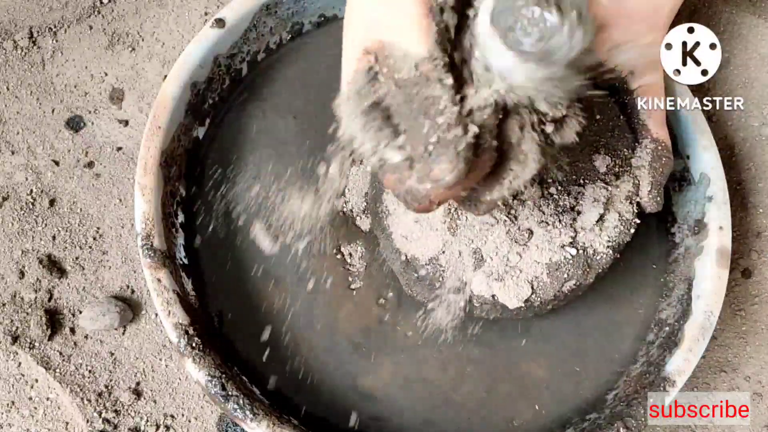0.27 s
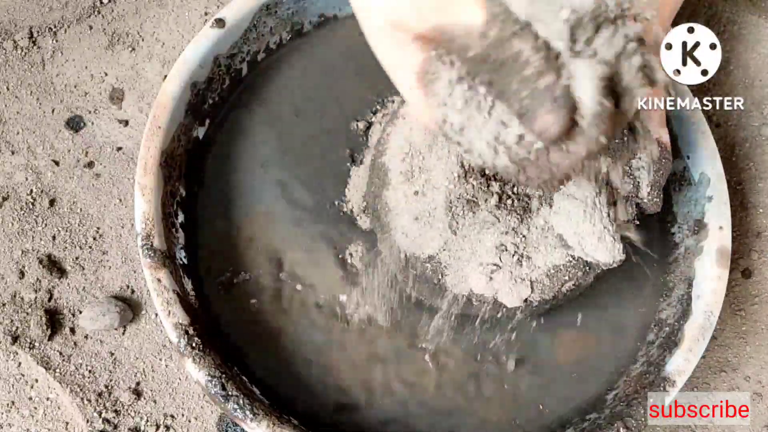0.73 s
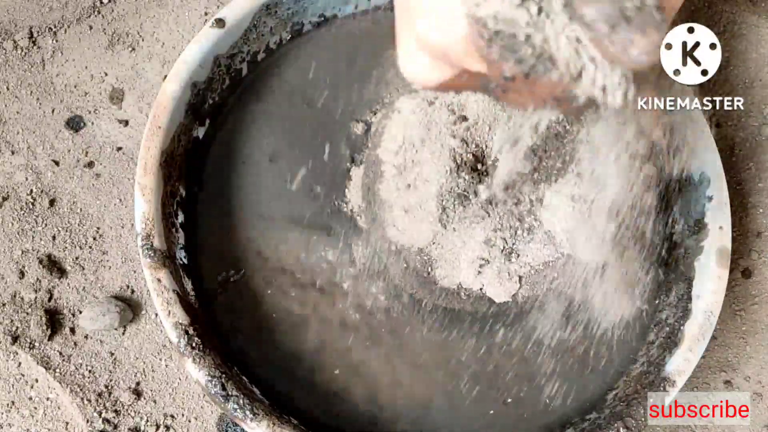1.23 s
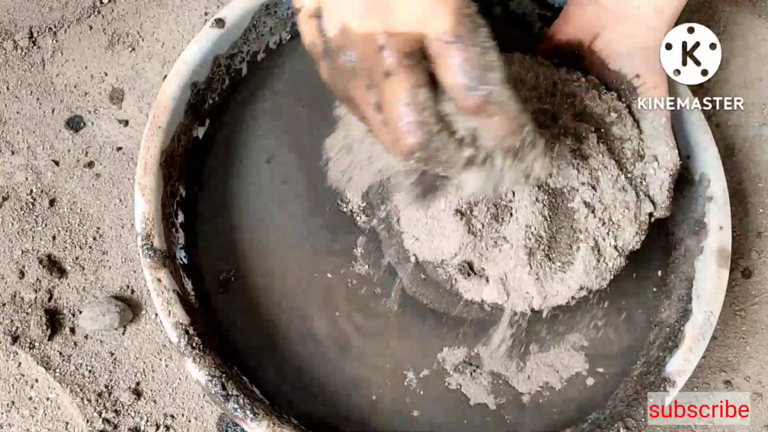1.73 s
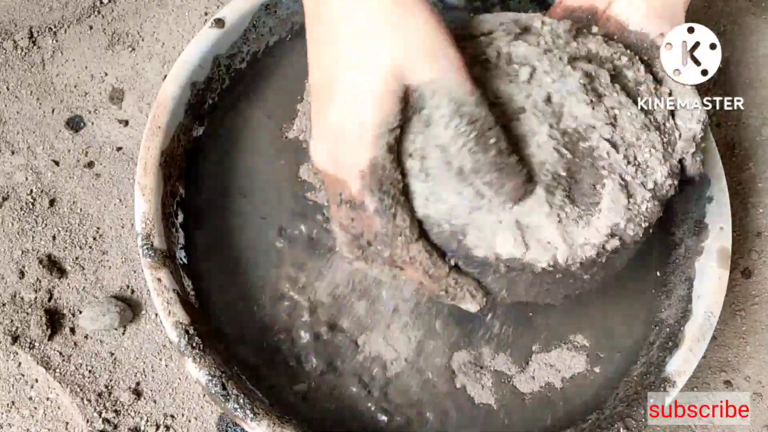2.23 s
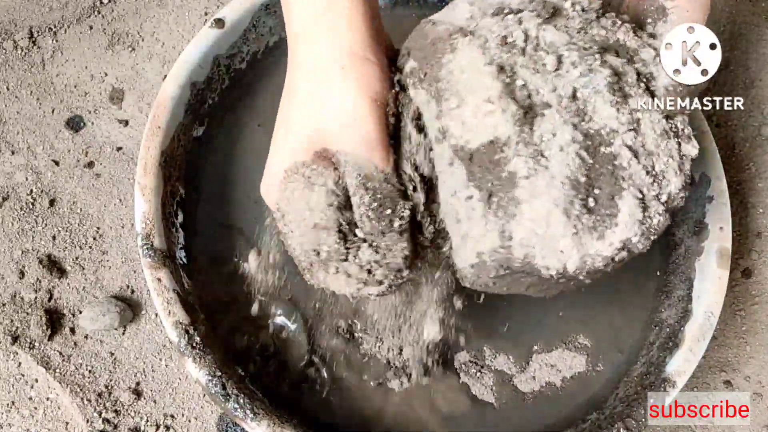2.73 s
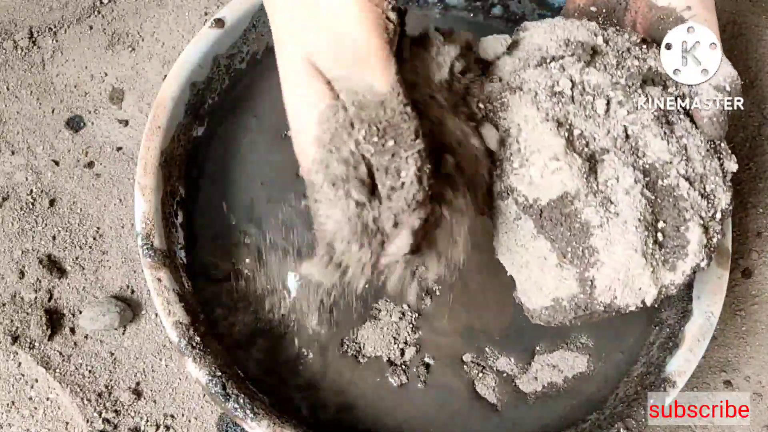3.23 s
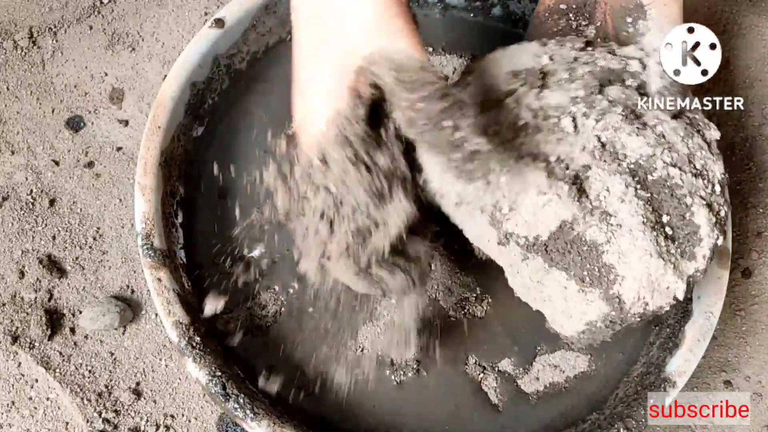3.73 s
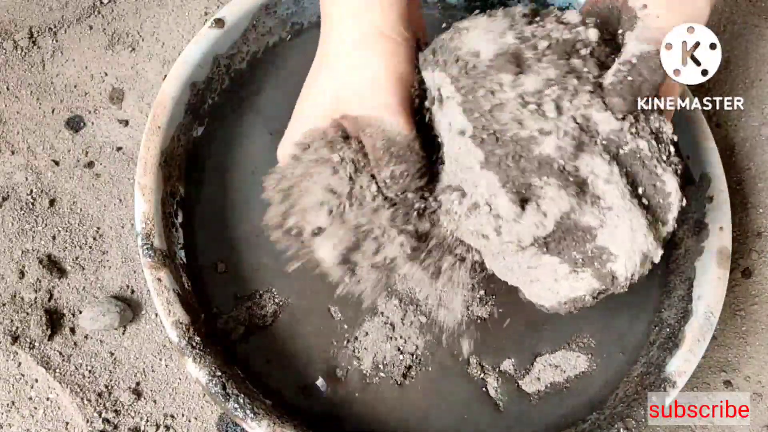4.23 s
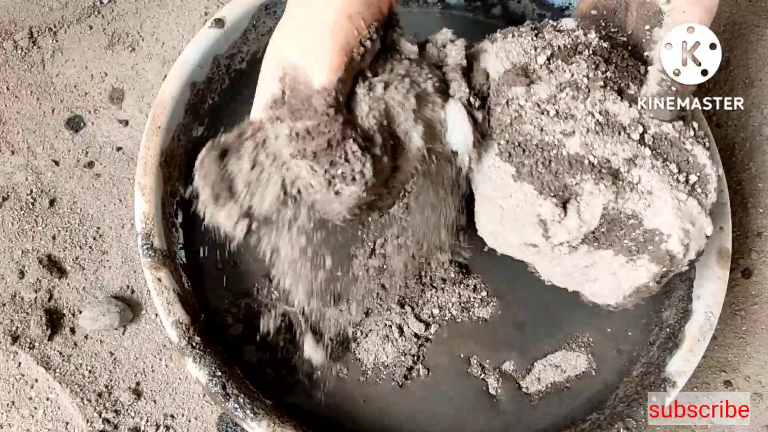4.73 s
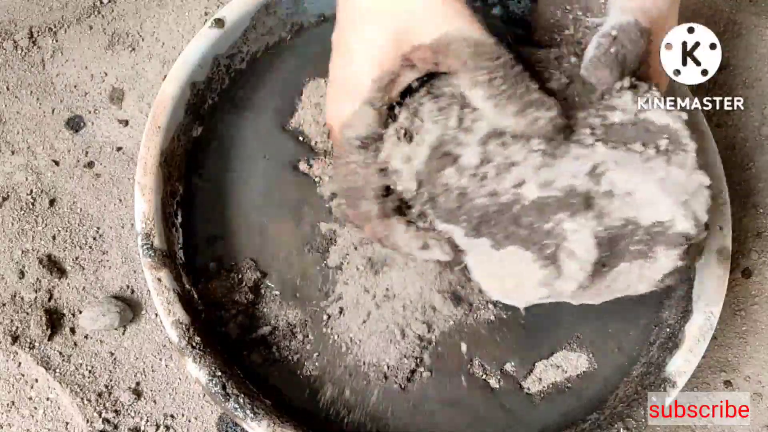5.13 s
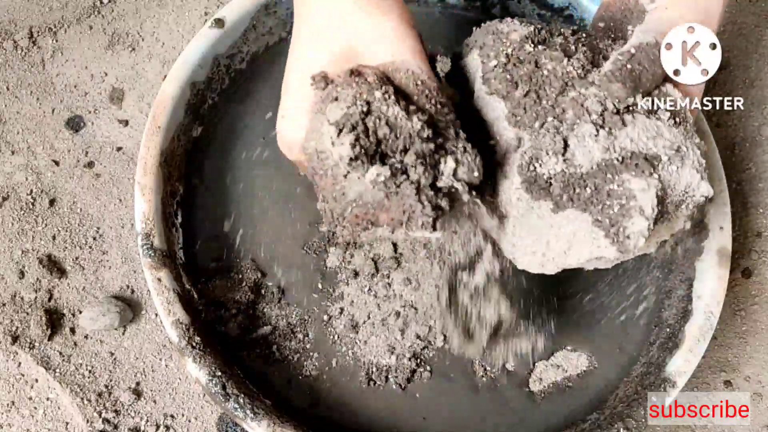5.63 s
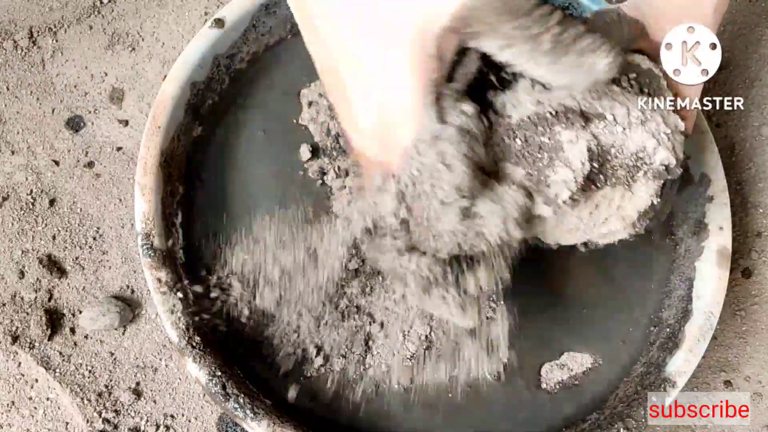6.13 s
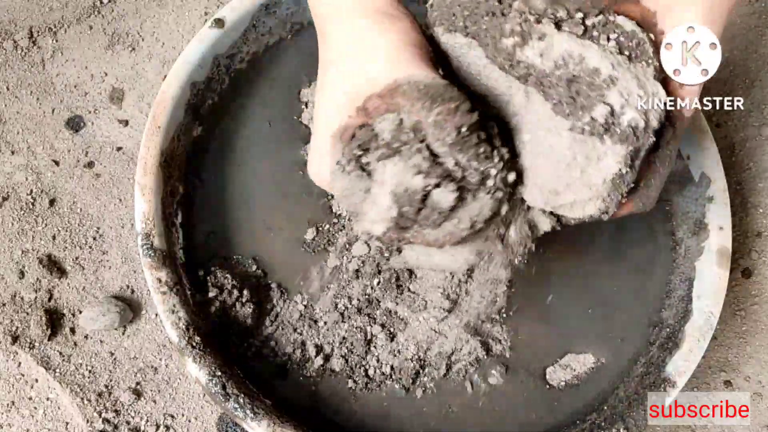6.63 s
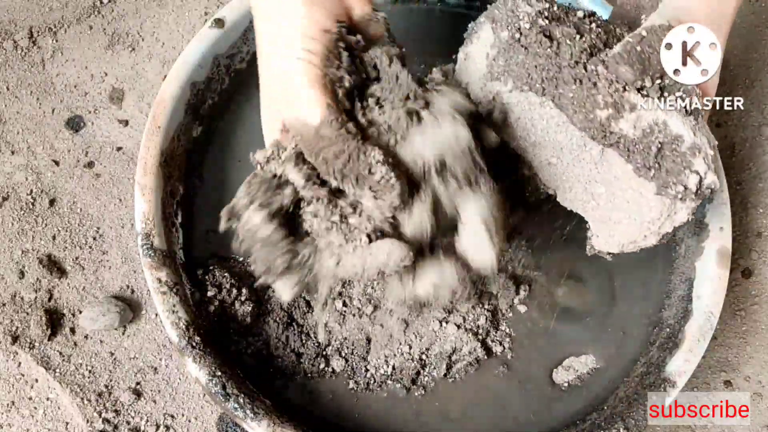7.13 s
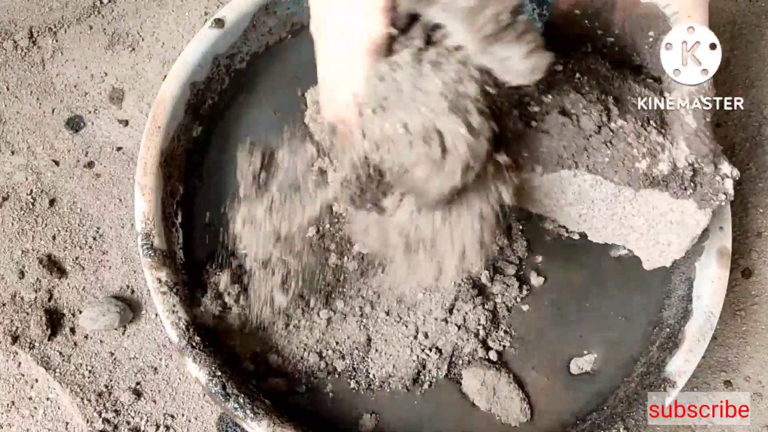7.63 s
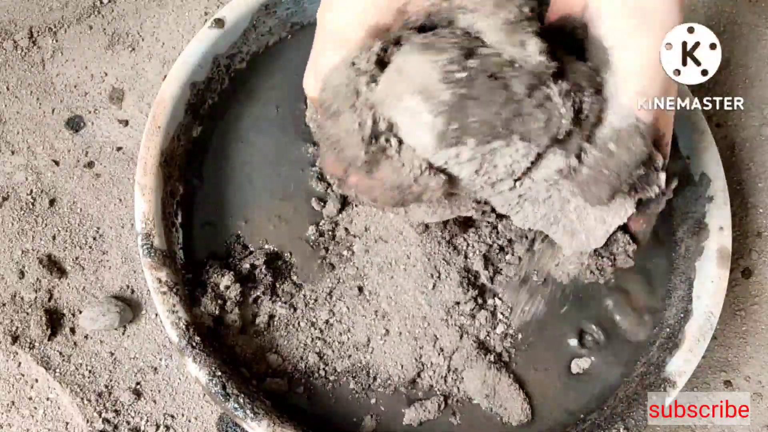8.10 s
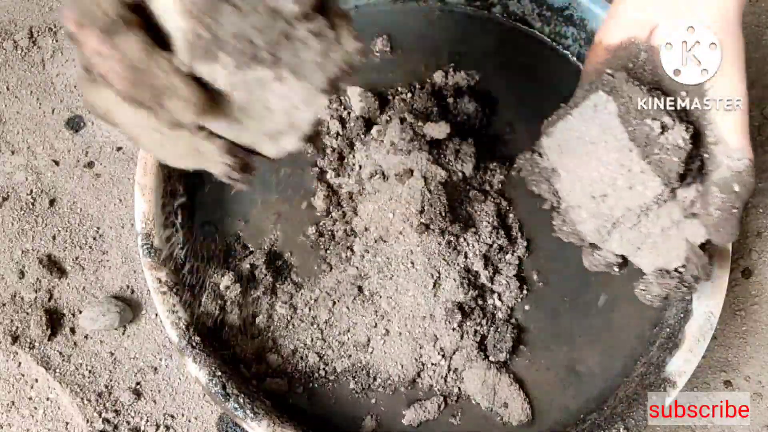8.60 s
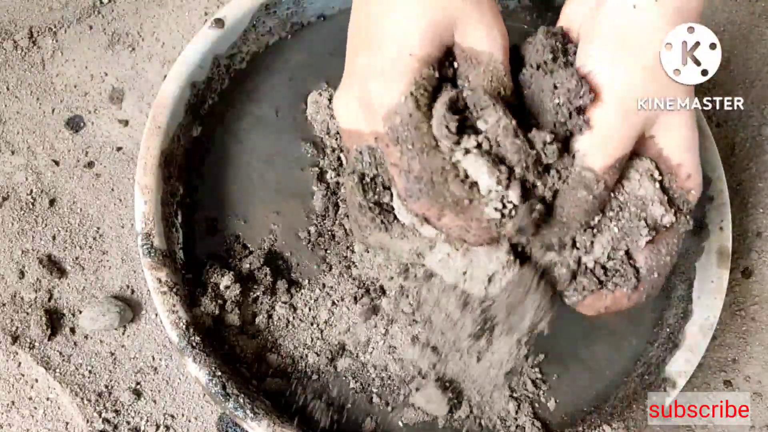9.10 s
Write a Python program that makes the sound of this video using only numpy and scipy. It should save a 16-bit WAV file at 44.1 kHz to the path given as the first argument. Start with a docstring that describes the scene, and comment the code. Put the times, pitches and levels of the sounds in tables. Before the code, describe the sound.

Very close, bright stereo sound of hands crumbling a sandy cement block over a metal basin of water outdoors. Gritty rubs come in short squeezes, each followed by a pattering shower on the water, with grain snaps and tiny plops. Light basin knocks appear from the middle; near nine seconds a big lump thumps hard with splashy plops. A low wavering hum and steady hiss lie underneath.

```python
"""Crumbling a sandy block over a basin of water

Two hands crumble sand and cement close to a hissy two-port microphone: clumped random grains make the rub
and shower, decaying sines the chips, bubbles and basin, noise bursts the snaps and splutter.
Handfuls gush, crumbs plop; near the end a big lump thumps the basin. Narrow noise bands make a wavering low
hum, and gliding tones a faint thin hiss that twice climbs in steps.
"""
import sys
import numpy as np
from scipy import signal
from scipy.fft import rfft, irfft, next_fast_len
from scipy.io import wavfile
from scipy.ndimage import uniform_filter1d

SR = 44100
rng = np.random.default_rng(int(sys.argv[2]) if len(sys.argv) > 2 else 0)


def file_out(sig):
    """Save sig as 16-bit WAV at sys.argv[1]."""
    # one column per channel
    cols = np.atleast_2d(sig).T
    # limit, then scale
    lim = np.clip(cols, -1, 1)
    pcm = np.round(lim * 32767).astype(np.int16)
    wavfile.write(sys.argv[1], SR, pcm)


N = 412776
TIME_S = np.arange(N) / SR

# Background before the ports. Each row: frequency in Hz, level in dB.
AIR_SPECTRUM = [(8, -4.5), (40, -17), (110, -28), (250, -24), (450, -27.5), (800, -39.5), (1500, -45.5),
                (3500, -41), (6500, -43.5), (8000, -33), (8900, -25.5), (10000, -22.5), (11500, -42),
                (15000, -40)]
# Left-right likeness of the air noise. Each row: frequency in Hz, correlation 0-1.
AIR_LIKENESS = [(20, 0.02), (150, 0.33), (400, 0.62), (1500, 0), (4000, 0), (9000, 0), (15000, 0)]
# Close tones that beat. Each row: frequency in Hz, bandwidth in Hz, relative level in dB.
HUM_TONES = [(163.7, 12.4, -3), (154.3, 12.8, -2.5)]
# Swell of the hum. Each row: time in seconds, level in dB.
HUM_SWELL = [(0.05, -52), (.3, -42), (0.42, -35), (0.5, -44.5), (0.98, -47), (1.28, -45.5), (1.43, -35.5),
             (1.55, -46.5), (2.0, -44), (2.2, -40.5), (2.5, -42), (2.78, -39), (2.9, -47.5), (3.7, -45),
             (3.82, -38), (4.2, -48), (4.35, -38.5), (4.85, -47), (5.35, -43), (5.47, -34.5), (5.8, -44.5),
             (6.1, -41.5), (6.5, -46.5), (6.65, -41), (7.15, -44), (7.6, -41), (8.2, -43), (8.5, -36.5),
             (8.82, -41), (9.2, -42.5)]
# Weaker tones around the hum, and a thin whine. Each row: frequency in Hz, bandwidth in Hz, level in dB.
DRONES = [(84, 4.2, -56.5), (213.8, 22.7, -47), (248.3, 14.6, -52.5), (289.3, 32, -57), (371, 8.6, -55),
          (8960, 86, -49)]
# Steps of the thin hiss. Each row: start in seconds, length in seconds, start Hz, end Hz, level in dB.
WHISTLES = [(1.292, .11, 4100, 4650, -36.5), (1.545, 0.14, 4120, 4760, -32),
            (1.668, 0.13, 4880, 5080, -36.5), (1.89, 0.18, 5100, 5400, -36), (2.044, 0.18, 5630, 5270, -35),
            (5.006, 0.175, 4040, 4240, -42), (5.131, 0.27, 4500, 4890, -37.5),
            (5.401, 0.097, 4050, 4420, -33), (5.45, 0.091, 4460, 5000, -35)]
# Block or lump against the basin; light, hard knocks favour the higher modes.
# Each row: time in seconds, level in dB, mode tilt in dB per octave.
BUMPS = [(2.597, -15.5, -1), (2.644, -21, -6), (2.752, -23, 10), (3.559, -22, 7), (4.277, -28, 2.5),
         (5.034, -19.5, 6), (7.346, -21, 5), (8.8572, 1.5, 3.5), (8.869, -11, -11), (8.926, -15, -8)]
# Water-loaded basin modes. Each row: frequency in Hz, level in dB, t60 in seconds.
BASIN_MODES = [(129, -29, 0.084), (155.8, -21, 0.24), (195, -18.5, 0.19), (252, -22.5, 0.11),
               (287, -23.5, .11), (350, -13, 0.091), (420, -7, 0.028), (478, -26.5, 0.14), (584, -40, 0.21),
               (695, -11.5, 0.0087)]
# Crumbs that trap air in the water.
# Each row: time in seconds, level in dB, bubble Hz, bubble t60 in seconds, slap in dB re the bubble.
PLOPS = [(0.6495, -24, 1200, .004, -6), (0.6537, -14.5, 1430, 0.0071, 2.5), (0.9894, -20, 1970, 0.006, -1),
         (1.1026, -21, 1200, 0.0077, 0), (1.04, -26, 1050, .007, -4), (1.16, -23, 3700, .005, -4),
         (1.204, -30.5, 1000, 0.006, -6), (1.3954, -26, 3000, .003, 3), (1.4022, -16.5, 1900, 0.0041, -4),
         (1.5508, -21.5, 1650, 0.0044, -2), (1.8204, -23, 2800, 0.0044, 0), (2.281, -26, 2100, 0.0055, 5),
         (2.623, -33, 1000, 0.0091, -6), (2.643, -24, 740, 0.01, -8), (2.649, -23, 1070, 0.012, 0),
         (2.768, -20.5, 1110, 0.0081, -8), (2.785, -29, 730, 0.0081, -6), (3.3032, -16.5, 2010, 0.007, -7),
         (3.4427, -24, 2200, 0.0036, 0), (3.8636, -27, 2000, .005, -3), (3.873, -21, 1070, 0.0058, -4),
         (4.274, -23, 1320, 0.01, -4), (4.2797, -17, 2880, .004, -5), (5.2472, -29, 2500, .004, -2),
         (5.4515, -23, 2600, .004, -2), (5.8112, -24, 1700, .006, -7), (6.057, -20, 1910, 0.004, 0),
         (6.075, -21, 2100, .005, 1), (6.077, -28, 1040, .01, -4), (6.2787, -23, 2570, .004, 3),
         (6.391, -22, 1780, 0.01, -9), (6.391, -26, 1070, 0.0088, -6), (6.4317, -30, 1900, 0.0044, -5),
         (6.473, -22, 2400, 0.0055, 0), (6.743, -25.5, 1710, 0.013, -8), (6.833, -28, 2300, 0.0047, -2),
         (7.6953, -24, 1940, 0.0047, -3), (7.6986, -22, 1500, 0.004, -2), (8.1285, -28, 1900, 0.0034, 5),
         (8.196, -22, 1900, 0.0046, -1), (8.857, -16, 1500, 0.0038, 1), (8.8578, -9, 1030, .006, -4),
         (8.9226, -15, 2300, 0.003, 0), (8.9269, -14, 2100, 0.0037, -2), (8.9617, -12, 1500, 0.0043, -5),
         (8.9635, -13.5, 1230, 0.0046, -1), (9.0078, -21, 1900, 0.0046, 0), (9.2252, -10, 1880, 0.0048, -1),
         (9.2262, -8, 990, 0.012, -4)]
# Steel wall after a plop, nominal. Each row: frequency in Hz, level in dB re the plop, t60 in seconds.
RIM_MODES = [(1000, -24, 0.11), (1070, -26, 0.087), (1650, -21, 0.079), (2450, -23, .04)]
# Cracking coarse grains. Each row: time in seconds, relative level in dB.
SNAPS = [(0.356, -18), (0.4107, -9.5), (0.4866, -10), (0.5383, -21), (0.5795, -16), (0.9886, -12.5),
         (1.4015, -5), (2.2594, -16), (2.6273, -7), (3.3003, -4), (3.3012, -2), (3.6232, -9), (4.093, -6),
         (4.272, -5), (4.2795, -6), (4.464, -12), (4.955, -5.5), (4.964, -16), (5.3154, -12), (5.349, -6),
         (5.5212, -9), (6.056, -4), (6.1828, -10), (6.575, -8), (6.7396, -6.5), (7.0244, -20), (7.346, -11),
         (7.6932, -10), (7.8683, -13), (8.854, -6), (8.9197, -8), (9.0332, -13), (9.223, -11)]
# Handfuls giving way.
# Each row: time of the top in seconds, relative level in dB, rise in seconds, wet part in dB re the dry.
GUSHES = [(0.206, -22, 0.0037, -15), (.245, -36, 0.0063, -10), (0.353, -23, 0.0046, 3.5),
          (0.485, -26, 0.0079, -7), (1.405, -31, 0.0037, 2), (2.303, -26, 0.049, -9),
          (2.63, -23.5, 0.033, -2.5), (2.652, -23.5, 0.036, -5), (2.79, -30, .008, -8),
          (3.3, -30.5, 0.041, -2), (3.866, -28, 0.0058, -0.5), (4.097, -20.5, 0.023, -9.5),
          (4.278, -16.5, 0.0087, -4), (4.294, -24, .008, -0.5), (4.316, -26, 0.0073, 3.5),
          (4.957, -18.5, 0.0013, -7.5), (5.358, -20, 0.036, -13.5), (5.522, -18, 0.0039, -5),
          (5.537, -23, 0.017, 3), (6.209, -20.5, 0.017, -2.5), (6.593, -19.5, 0.02, -10),
          (6.742, -27.5, 0.017, -7), (7.032, -26.5, 0.014, -1), (7.345, -23.5, 0.0038, -7),
          (7.698, -34, 0.0073, 6), (8.858, -18, 0.0023, -4), (8.877, -22.5, .008, -15),
          (8.925, -27, .006, -10), (9.029, -22.5, 0.094, -3), (9.226, -30, 0.034, 3)]
# Fingers squeezing the block.
# Each row: start in seconds, length in seconds, rub in the hand in relative dB, shower in relative dB.
SQUEEZES = [(0.035, 0.026, -30.5, -51), (0.174, 0.089, -31.5, -59), (0.383, 0.39, -27.5, -35),
            (0.883, 0.25, -29.5, -34.5), (1.205, 0.16, -32, -43), (1.354, 0.065, -25, -33),
            (1.513, 0.16, -27.5, -35.5), (1.764, 0.086, -24.5, -42), (1.897, 0.14, -26, -36),
            (2.273, 0.23, -29.5, -40), (2.61, 0.14, -45, -32.5), (2.719, 0.13, -25.5, -29),
            (2.9, 0.28, -27, -40.5), (3.277, 0.07, -32, -34.5), (3.378, 0.18, -27.5, -37.5),
            (3.563, 0.21, -27.5, -37.5), (3.84, 0.22, -32, -39.5), (4.075, 0.12, -29, -40.5),
            (4.262, 0.73, -26.5, -32), (5.123, 0.08, -27.5, -41), (5.38, 0.081, -30.5, -41.5),
            (5.537, 0.28, -28, -36), (5.74, 0.59, -25.5, -33), (6.344, 0.17, -24, -38),
            (6.546, 0.092, -35, -37.5), (6.742, 0.13, -28.5, -32.5), (6.859, 0.061, -25, -32),
            (7.298, 0.4, -29, -33.5), (7.809, 0.082, -26.5, -40.5), (8.018, 0.11, -29.5, -46),
            (8.114, 0.099, -26.5, -39), (8.378, 0.041, -30, -45), (8.614, 0.018, -69, -118),
            (8.86, 0.13, -24, -30), (9.057, 0.45, -23, -28)]
# Colour of grit on water. Each row: frequency in Hz, gain in dB.
SHOWER_SPECTRUM = [(100, -9.5), (350, -1), (720, -3), (1100, -2.5), (2200, 5), (4000, -2.5), (7000, -9.5),
                   (10000, -7.5), (15000, -6.5)]
# Colour of dry grit and snaps. Each row: frequency in Hz, gain in dB.
RUB_SPECTRUM = [(100, -29), (900, -22.5), (2500, -4), (4500, -2), (7000, -2.5), (9000, -2.5), (11000, -1.5),
                (15000, -6)]
# Treble resonance of each port. Each row: frequency in Hz, gain in dB.
LEFT_PORT = [(60, -1), (160, 2.5), (400, -2), (1000, 2), (2500, -1.5), (5500, 2), (6800, 4.5), (8000, 12.5),
             (8800, 14), (9500, 6), (10200, -1), (11200, -7), (15000, -8.5)]
RIGHT_PORT = [(60, -5.5), (160, -3), (400, -6), (1000, 0.2), (2500, -1), (5500, 3.5), (6500, 10),
              (7300, 15), (8200, 10), (8900, 8.5), (10000, -4), (11200, -7), (15000, -10)]

PUSH_DB, PUSH_S = -25, 0.0016  # a blow also shoves the water: one low push
SLOSH_DB, SLOSH_RISE_S, SLOSH_FALL_S = -25, 0.0087, 0.045  # the shoved water churns
SLOSH_LOW_HZ, SLOSH_HIGH_HZ = 120, 340
RIM_SPREAD = 0.08  # share by which the wall's pitch varies with the place of the blow and the water
GUSH_FALL_S, FALL_PER_RISE = 0.017, 0.6  # a handful that breaks slowly also runs out slowly
GRIP_S, GRIP_SHARE = 0.014, 0.18  # the grip builds more slowly in a long squeeze
SAG_DB_PER_S = 7.5  # then eases as the sand gives way
RUB_RELEASE_S = 0.076  # rubbing dies when the fingers open
FALL_S, TRICKLE_S = 0.0011, 0.13  # sand reaches the water later and trickles on
IDLE_RUB_DB, IDLE_SHOWER_DB = -40.5, -71.5  # grit shed even between squeezes
WALL_DB = -4.5  # echoes off the basin wall and the ground
HAND_SWAY_HZ = 0.8926  # moving hands change the echo paths
EDGE_HZ = 15350


def gain_of(db):
    """Decibels to amplitude."""
    return 10 ** (np.asarray(db) / 20)


def evened(x):
    """Scales to rms 1."""
    return x / np.sqrt(np.mean(abs(x) ** 2) + 1e-20)


def read(points, hz):
    """Interpolates a spectrum table on a log-frequency axis."""
    f, value = np.transpose(points)
    return np.interp(np.log(hz + 1), np.log(f + 1), value)


def follow(rows):
    """Turns a curve of (s, dB) into a gain for every sample."""
    time_s, db = np.transpose(rows)
    return gain_of(np.interp(TIME_S, time_s, db))


def add(mix, start_s, sound):
    """Mixes a sound in at start_s."""
    part = mix[max(round(start_s * SR), 0):][:len(sound)]
    part += sound[:len(part)]


def decay(t, t60):
    """Exponential ringing loss: 60 dB in t60."""
    return np.exp(-np.log(1000) * t / t60)


def colour(x, points, size=4096):
    """Minimum-phase filter with the given spectrum: clicks keep their sharp front."""
    hz = abs(np.fft.fftfreq(size, 1 / SR))
    log_gain = np.log(gain_of(read(points, hz)))
    response = np.exp(np.conj(signal.hilbert(log_gain)))
    taps = np.fft.ifft(response).real[:size // 2]
    return signal.oaconvolve(np.atleast_2d(x), taps[None], axes=1)[:, :N]


def narrow(hz, width_hz):
    """Complex noise in one narrow band: a slowly drifting phasor that turns at hz."""
    knots_s = np.arange(-1, 11, 1 / 500)
    offset_hz = np.fft.fftfreq(len(knots_s), knots_s[1] - knots_s[0])
    shape = 1 / (1 + (2 * offset_hz / width_hz) ** 4)
    noise = [1, 1j] @ rng.standard_normal((2, len(knots_s)))
    drift = evened(np.fft.ifft(shape * np.fft.fft(noise)))
    drift = np.interp(TIME_S, knots_s, drift)
    return drift * np.exp(2j * np.pi * hz * TIME_S) if hz else drift


def modes(table, t, tilt_db=0):
    """Free ringing of a struck object; neighbouring modes swing in opposite senses."""
    middle_hz = np.median(np.transpose(table)[0])
    ringing = np.zeros(len(t))
    for k, (hz, db, t60_s) in enumerate(table):
        level = gain_of(db + tilt_db * np.log2(hz / middle_hz))
        ringing += (-1) ** k * level * decay(t, t60_s) * np.sin(2 * np.pi * hz * t)
    return ringing


def air():
    """Steady outdoor rumble and hiss: shaped noise partly shared by the ports."""
    size = next_fast_len(N)
    hz = np.fft.rfftfreq(size, 1 / SR)
    left, other = rfft(rng.standard_normal((2, size)))
    same = np.clip(read(AIR_LIKENESS, hz), -1, 1)
    right = same * left + np.sqrt(1 - same ** 2) * other
    return irfft(np.array([left, right]) * gain_of(read(AIR_SPECTRUM, hz)), size)[:, :N]


def hum():
    """Two close narrow tones beat and swell, among weaker drifting tones and rumble."""
    main = evened(sum(gain_of(db) * narrow(hz, width_hz) for hz, width_hz, db in HUM_TONES))
    main = evened((main / (abs(main) + 1.2)).real)  # limits the swing of the beats
    drones = sum(gain_of(db) * evened(narrow(hz, width_hz).real) for hz, width_hz, db in DRONES)
    rumble = narrow(255, 120).real * gain_of(3.5 * narrow(0, 12).real)
    return gain_of(0.03) * main * follow(HUM_SWELL) + drones + gain_of(-53) * evened(rumble)


def whistles():
    """Faint gliding tones, blurred by lowpassed noise, break up as they swell and fade."""
    out = np.zeros((2, N))
    fuzz = signal.butter(1, 110, fs=SR)
    for start_s, length_s, start_hz, end_hz, db in WHISTLES:
        size = int(length_s * SR)
        hz = np.linspace(start_hz, end_hz, size)
        tone = np.cos(2 * np.pi * np.cumsum(hz) / SR)
        for port in out:
            waver = signal.lfilter(*fuzz, rng.standard_normal(SR))[:size]
            add(port, start_s, gain_of(db) * evened(tone * waver) * signal.windows.hann(size))
    return out * evened(gain_of(2 * narrow(0, 220).real))


def bumps():
    """Blows ring the water-loaded basin's low modes, push the water and make it churn."""
    out, t = np.zeros(N), np.arange(SR // 2) / SR
    push = gain_of(PUSH_DB) * np.sin(t / PUSH_S) * np.exp(-t / (4 * PUSH_S))
    band = signal.butter(2, [SLOSH_LOW_HZ, SLOSH_HIGH_HZ], "bandpass", fs=SR)
    churn = gain_of(SLOSH_DB) * (1 - np.exp(-t / SLOSH_RISE_S)) * np.exp(-t / SLOSH_FALL_S)
    for start_s, db, tilt_db in BUMPS:
        slosh = churn * evened(signal.lfilter(*band, rng.standard_normal(len(t))))
        add(out, start_s, gain_of(db) * (modes(BASIN_MODES, t, tilt_db) + push + slosh))
    return out


def bubble(hz, t60_s, glide, onset_s):
    """Trapped air rings a few cycles, rising in pitch, and is choked off at the surface."""
    t = np.arange(int(t60_s * SR * 2)) / SR
    tone = np.sin(2 * np.pi * hz * t * (1 + glide * t / t60_s))
    choke = np.exp(-np.log(1000) * (t / t60_s) ** 2)
    return tone * choke * (1 - np.exp(-t / onset_s))


def plops():
    """Each crumb slaps the surface, splutters, rings one bubble and stirs the steel wall."""
    out, t = np.zeros(N), np.arange(SR // 10) / SR
    band = signal.butter(2, [750, 3600], "bandpass", fs=SR)
    click = signal.lfilter(*band, (t == 0).astype(float))
    click /= abs(click).max()
    for start_s, db, hz, t60_s, slap_db in PLOPS:
        splutter = evened(signal.lfilter(*band, rng.standard_normal(len(t)))) * np.exp(-t / 0.0012)
        slap = gain_of(slap_db) * (click + gain_of(-12.5) * splutter)
        # stretched time shifts both pitch and decay
        rim = modes(RIM_MODES, t * (1 + RIM_SPREAD * rng.uniform(-1.05, 1)))
        add(out, start_s, gain_of(db) * (slap + rim))
        add(out, start_s, gain_of(db) * bubble(hz, t60_s, glide=0.033, onset_s=0.00024))
    return np.array([np.roll(out, 2), out])  # left port 2 samples late


def snaps():
    """A coarse grain cracks: a clipped noise burst of a few milliseconds."""
    out, t = np.zeros(N), np.arange(SR // 50) / SR
    for start_s, db in SNAPS:
        crack = np.tanh(rng.standard_normal(len(t)) * 2) * np.exp(-(t / 0.0014) ** 2)
        add(out, start_s, gain_of(db - 3) * crack)
    return colour([np.roll(out, 2), out], RUB_SPECTRUM)


def impacts(per_s, spread_db):
    """Places and signed sizes of random impacts, most small and a few large, plus a spare draw."""
    own = np.random.default_rng(rng.integers(2 ** 31))
    place, size, sign, spare = own.random((int(per_s * N / SR), 4)).T
    at = (place * (N - 16)).astype(int) + 8
    strength = np.sign(sign - 0.5) * gain_of(-spread_db * np.log(size + 0.01))
    return at, strength, spare


def grit(per_s, spread_db, clump_db, lags=8):
    """Grains land all over in clumps, each reaching the left port with its own lag."""
    at, strength, side = impacts(per_s, spread_db)
    lag = (side * lags).astype(int) - 1
    out = np.array([np.bincount(at + lag, strength, N), np.bincount(at, strength, N)])
    return evened(out * gain_of(clump_db * evened(narrow(0, 44).real)))


def pings(per_s, spread_db, cycles, low_hz, high_hz, size=600):
    """Tiny bubbles or chips, each ringing a few cycles at its own pitch and place."""
    at, strength, small = impacts(per_s, spread_db)
    hz = low_hz * (high_hz / low_hz) ** small
    turns = hz[:, None] * np.arange(size) / SR
    rings = strength[:, None] * np.sin(2 * np.pi * turns) * decay(turns, cycles)
    right = at[:, None] + np.arange(size)
    left = right + at[:, None] % 15 - 5  # own lag per ping
    return evened(np.array([np.bincount(port.ravel(), rings.ravel(), N)[:N] for port in (left, right)]))


def mottle(x, patchy_db, size=256, count=7):
    """Uneven colour: patches about 500 Hz wide and 20 ms long stand out or drop back."""
    z = signal.stft(x, nperseg=size)[2]
    patches = uniform_filter1d(rng.standard_normal(z.shape[1:]), count, axis=1)
    patches = uniform_filter1d(patches, count // 2, axis=0)
    gain = evened(gain_of(patchy_db * evened(patches)))
    return signal.istft(z * gain, nperseg=size)[1][:, :N]


def gush_envelopes():
    """Each gush swells and dies away; returns the strengths of its dry and wet parts."""
    dry, wet = np.zeros((2, N))
    t = np.arange(-SR // 8, SR // 4) / SR
    for top_s, db, rise_s, wet_db in GUSHES:
        fall_s = GUSH_FALL_S + FALL_PER_RISE * rise_s
        shape = np.exp(-np.where(t < 0, (t / rise_s) ** 2, t / fall_s))
        power = (gain_of(db) * shape) ** 2
        add(dry, top_s + t[0], power)
        add(wet, top_s + t[0], power * gain_of(wet_db) ** 2)
    return np.sqrt(dry), np.sqrt(wet)


def squeeze_envelope(t, length_s, release_s):
    """Rounded attack, a steadily sagging hold, and release."""
    attack = np.tanh(t / (GRIP_S + GRIP_SHARE * length_s))
    return attack * gain_of(-SAG_DB_PER_S * t) * np.exp(-np.maximum(t - length_s, 0) / release_s)


def squeezes():
    """Each squeeze rubs grit and lets a shower fall; powers add, returns both strengths."""
    rub, shower = np.zeros((2, N))
    t = np.arange(2 * SR) / SR
    for start_s, length_s, rub_db, shower_db in SQUEEZES:
        add(rub, start_s, (gain_of(rub_db) * squeeze_envelope(t, length_s, RUB_RELEASE_S)) ** 2)
        trickle = gain_of(shower_db) * squeeze_envelope(t, length_s, TRICKLE_S)
        add(shower, start_s + FALL_S, trickle ** 2)
    return np.sqrt(rub + gain_of(IDLE_RUB_DB) ** 2), np.sqrt(shower + gain_of(IDLE_SHOWER_DB) ** 2)


def sand():
    """Dry grit rubs, chips and ticks in the hand, then patters and fizzes on water among crumbs and clods."""
    dry, wet = gush_envelopes()
    rub, shower = squeezes()
    falling = np.hypot(gain_of(3) * shower, gain_of(1.5) * wet)

    chips = pings(per_s=390, spread_db=-0.5, cycles=18, low_hz=2300, high_hz=11100)
    rubbing = rub * (grit(per_s=8000, spread_db=1.0, clump_db=1.7) + gain_of(-13.5) * chips)
    breaking = gain_of(2.5) * dry * grit(per_s=9000, spread_db=2.0, clump_db=2.6)
    fine = grit(per_s=4000, spread_db=0.6, clump_db=0.85)
    coarse = grit(per_s=140, spread_db=-0.5, clump_db=2.5)
    patter = falling * colour(fine + gain_of(-9) * coarse, SHOWER_SPECTRUM)
    grains = mottle(colour(rubbing + breaking, RUB_SPECTRUM) + patter, patchy_db=2.5)

    fizz = pings(per_s=400, spread_db=-1.0, cycles=4.4, low_hz=1825, high_hz=6050)
    crumbs = pings(per_s=140, spread_db=-0.5, cycles=16, low_hz=907, high_hz=2590)
    clods = pings(per_s=260, spread_db=0.0, cycles=5.5, low_hz=480, high_hz=1200)
    pieces = pings(per_s=110, spread_db=0.0, cycles=3.5, low_hz=1200, high_hz=4500)
    ticks = pings(per_s=45, spread_db=1.0, cycles=1.8, low_hz=1500, high_hz=5500)
    in_hand = gain_of(-13.5) * dry * pieces + gain_of(-20) * rub * ticks
    on_water = gain_of(-15) * shower * fizz + gain_of(-18) * falling * crumbs + gain_of(-21) * wet * clods
    return grains + in_hand + on_water


def reflections(x, t60_s, count=160):
    """Basin wall and ground scatter a short tail of sparse echoes, different at each port."""
    t = np.arange(SR // 8) / SR
    taps = np.zeros((2, len(t)))
    for port in taps:
        port[rng.integers(SR // 700, len(t), count)] = rng.choice([-1, 1], count)
    taps *= decay(t, t60_s)
    taps /= np.linalg.norm(taps, axis=1, keepdims=True)
    return signal.oaconvolve(x, taps, axes=1)[:, :N]


def scene():
    """The work at the basin, with echoes that shift as the hands move, over the background."""
    work = sand() + snaps() + plops()
    sway = 2 * np.pi * HAND_SWAY_HZ * TIME_S
    # four echo patterns fade in and out at multiples of the sway
    echoes = sum(reflections(work * np.cos(k * (sway + 1)), t60_s=0.13) for k in range(1, 5)) / np.sqrt(2)
    return air() + hum() + whistles() + bumps() + work + gain_of(WALL_DB) * echoes


def record(dry):
    """Two resonant microphone ports, a soft ceiling on the sharpest peaks, then the band limit."""
    heard = np.vstack([colour(dry[0], LEFT_PORT), colour(dry[1], RIGHT_PORT)])
    heard = heard / (1 + (heard / 0.85) ** 6) ** (1 / 6)
    edge = signal.firwin(511, EDGE_HZ, window=("kaiser", 9), fs=SR)
    return signal.oaconvolve(heard, edge[None], "same", axes=1)


dry = scene()
out = record(dry)
file_out(out)
```